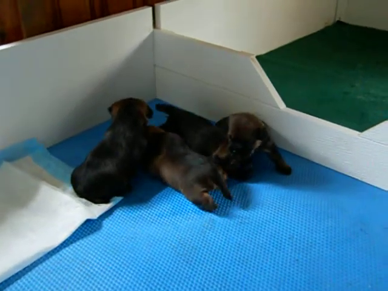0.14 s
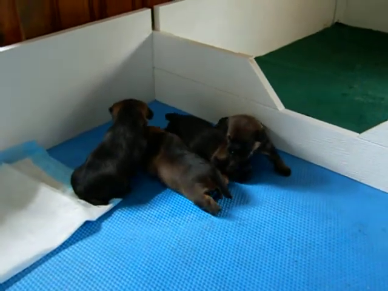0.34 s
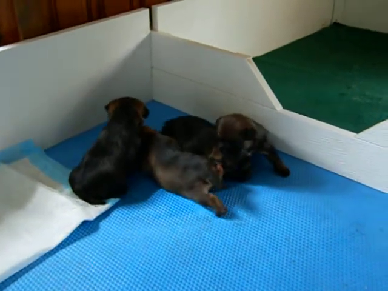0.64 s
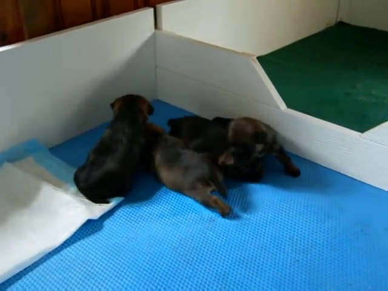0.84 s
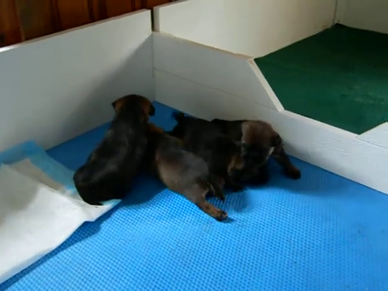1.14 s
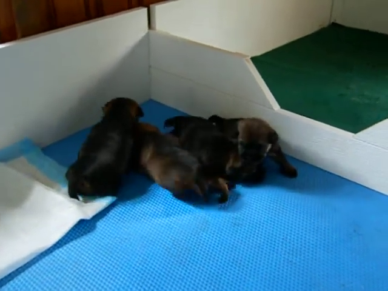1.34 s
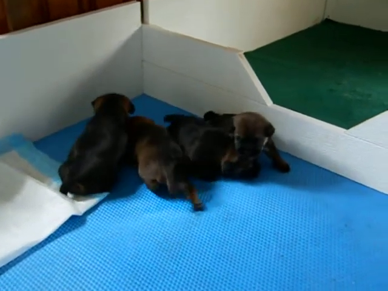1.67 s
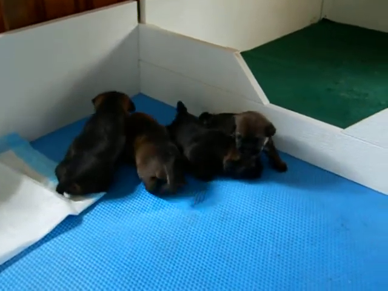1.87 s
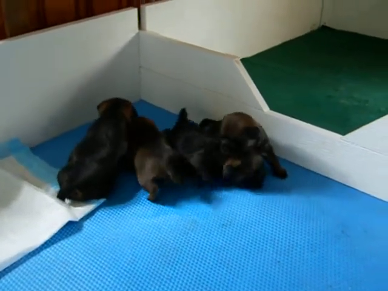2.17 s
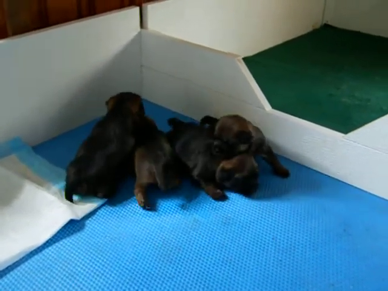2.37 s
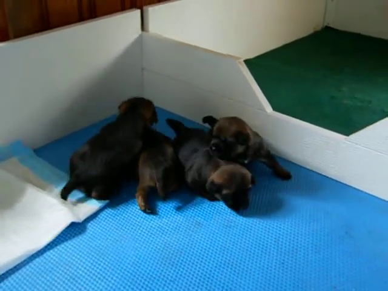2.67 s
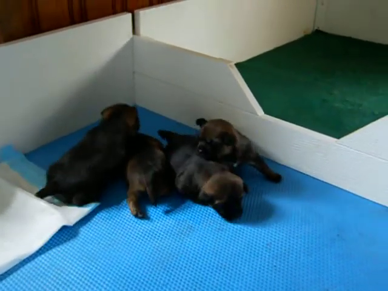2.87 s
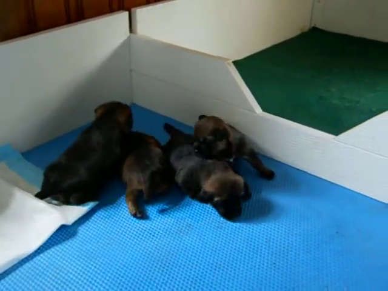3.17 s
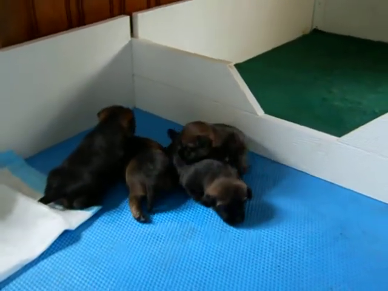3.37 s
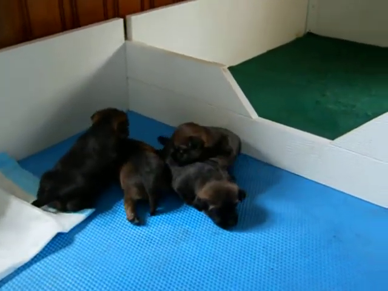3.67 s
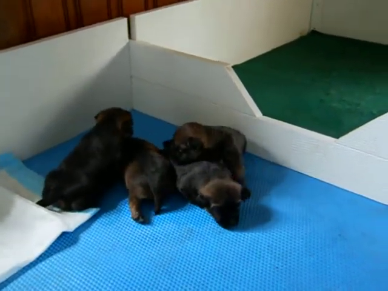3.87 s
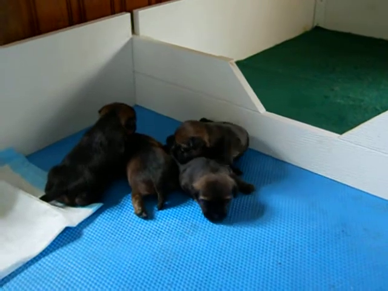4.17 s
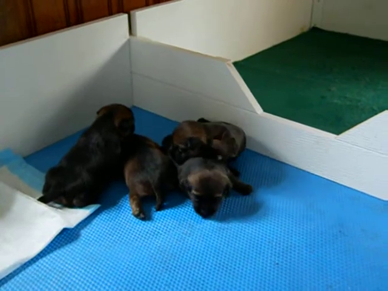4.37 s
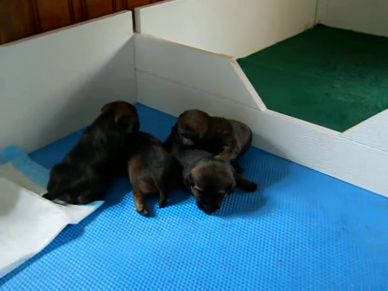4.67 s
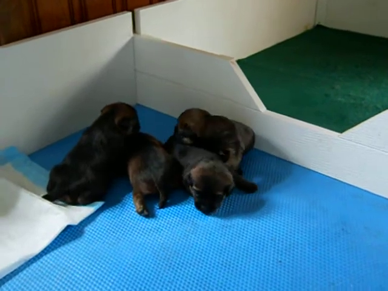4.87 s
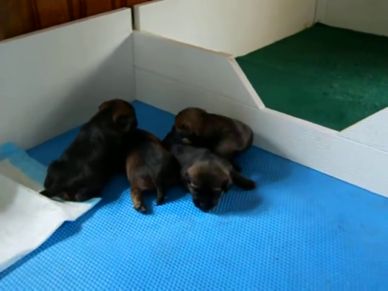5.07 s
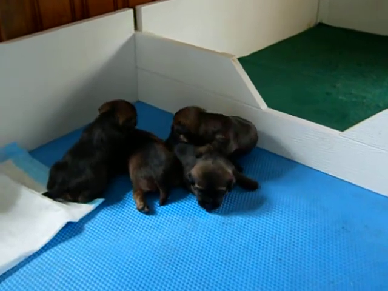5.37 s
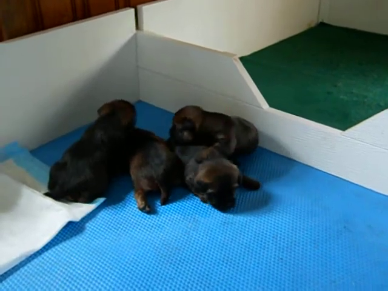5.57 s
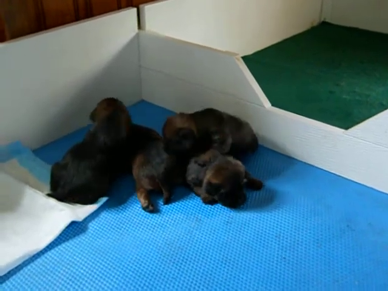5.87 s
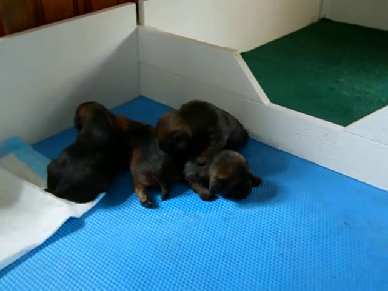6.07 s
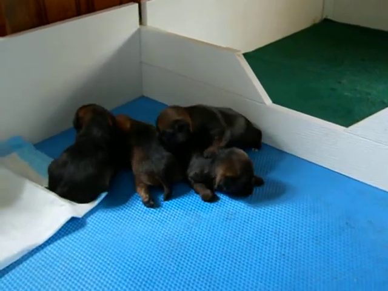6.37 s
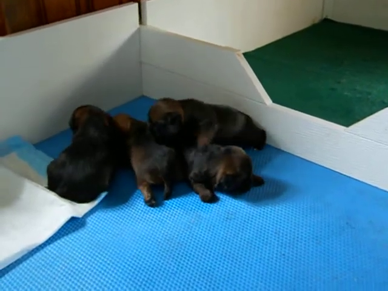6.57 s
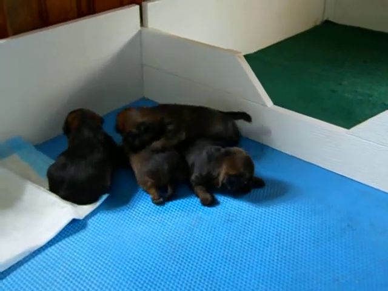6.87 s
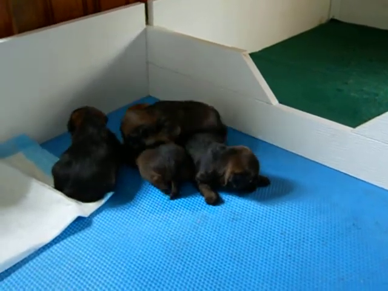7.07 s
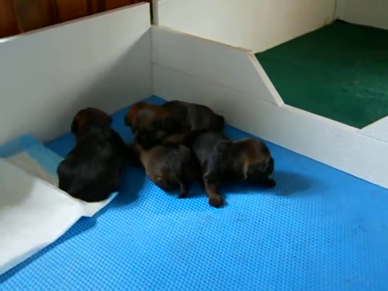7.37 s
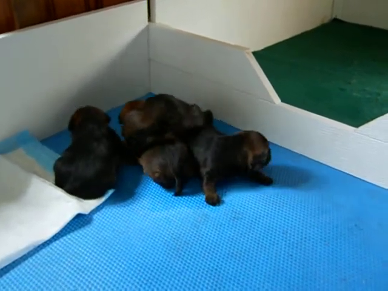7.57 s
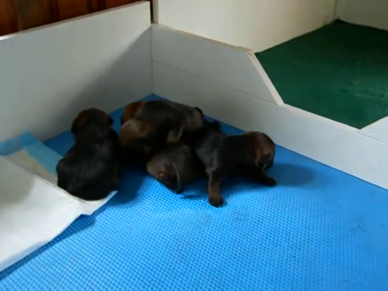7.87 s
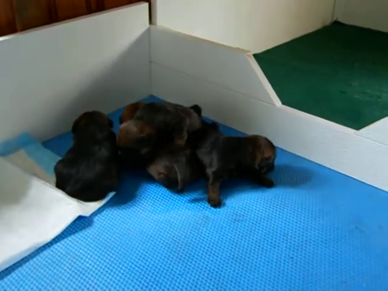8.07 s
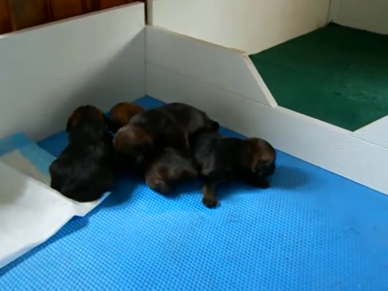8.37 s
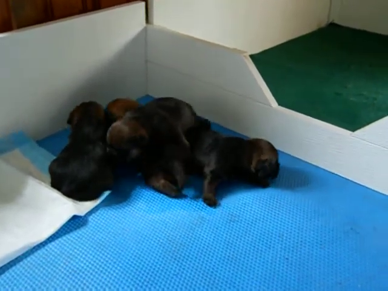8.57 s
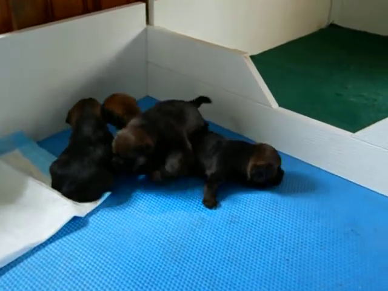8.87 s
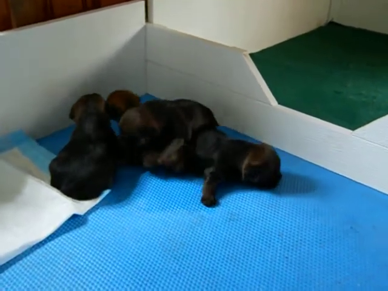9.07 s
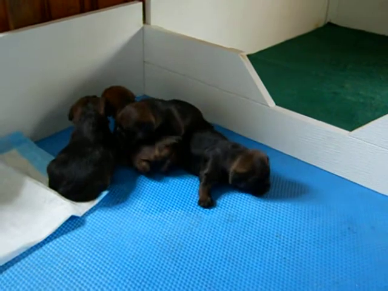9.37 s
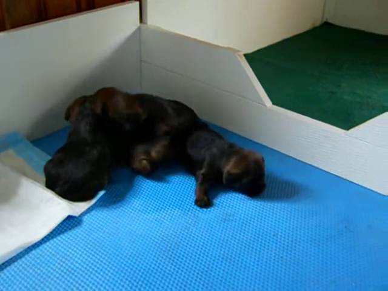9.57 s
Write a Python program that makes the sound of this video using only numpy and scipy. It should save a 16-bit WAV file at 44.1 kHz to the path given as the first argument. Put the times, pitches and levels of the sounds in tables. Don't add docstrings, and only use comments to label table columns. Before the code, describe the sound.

A small camera microphone about a metre away hears tiny pups over low appliance hum and hiss. Paws and fur brush the ribbed mat, claws click sharply, and thin whistle-like squeaks leap upward. Lower whines sag and waver; later one loud cry shakes, drops into a chesty moan and a string of grunts. The boards add a short, boxy ring, and the ending is sparse with mat noises.

```python
import sys
import numpy as np
from scipy import signal
from scipy.fft import rfft, irfft, next_fast_len
from scipy.io import wavfile
from scipy.ndimage import uniform_filter1d

SR = 44100
rng = np.random.default_rng(int(sys.argv[2]) if len(sys.argv) > 2 else 0)


def ratio(d):
    e = np.asarray(d, float) / 20
    return 10 ** e


def digitize_waveform(pressure):
    field = np.atleast_2d(pressure).T
    bounded = np.clip(field, -1, 1)
    quanta = np.round(bounded * 32767).astype(np.int16)
    wavfile.write(sys.argv[1], SR, quanta)


N = 429516
T = np.arange(N) / SR
CONVERTER_HZ = 16000


def level(x, db):
    return x * ratio(db) / np.sqrt(np.mean(x ** 2))


def shape_db(hz, table):
    table_hz, table_db = np.array(table).T
    return np.interp(np.log(hz + 1), np.log(table_hz), table_db)


def colour(x, table):
    size = next_fast_len(len(x))
    hz = np.arange(size // 2 + 1) * SR / size
    return irfft(rfft(x, size) * ratio(shape_db(hz, table)), size)[:len(x)]


def band(x, hz, width):
    edges = [max(hz - width / 2, 10), hz + width / 2]
    return signal.sosfilt(signal.butter(2, edges, "band", fs=SR, output="sos"), x)


def wobble(size, rate):
    hold = max(int(SR / rate), 2)
    steps = np.repeat(rng.standard_normal(size // hold + 1), hold)
    return 1.18 * uniform_filter1d(steps, hold)[:size]


def bump(s, half, power=2):
    out = np.zeros(N)
    span = slice(max(int((s - 5 * half) * SR), 0), int((s + 5 * half) * SR))
    out[span] = np.exp(-np.abs((T[span] - s) / half) ** power)
    return out


def play(table):
    s, *columns = np.transpose(table)
    span = slice(int(s[0] * SR), int(s[-1] * SR))
    to_edge_s = np.minimum(T[span] - s[0], s[-1] - T[span])
    edge = np.clip(to_edge_s / 0.0017, 0, 1)
    return span, [np.interp(T[span], s, c) for c in columns], edge


def background():
    # (pitch [Hz], wander [Hz], rms level [dB])
    hum_tones = [(58.2, 7.4, -56.5), (121, 4.5048, -53), (199.4, 2.09, -53)]
    # (frequency [Hz], density [dB per Hz])
    hiss_spectrum = [(20, -9), (45, -9), (90, -12.5), (150, -10.5), (260, -12), (490, -11.5), (1400, -15.5),
                     (3000, -18), (6100, -20.5)]
    hum = np.zeros(N)
    for hz, wander, db in hum_tones:
        phase = 2 * np.pi * np.cumsum(hz + wander * wobble(N, rate=16)) / SR
        hum += level(ratio(1.3 * wobble(N, rate=12)) * np.sin(phase), db)
    hiss = level(colour(rng.standard_normal(N), hiss_spectrum), -39.5)
    return hum + ratio(0.14 * wobble(N, rate=2.0)) * hiss


def scuffs():
    # (middle [s], rms level [dB], centre [Hz], length [s])
    slides = [(0.067, -41, 3816, .07), (0.242, -40, 3497, 0.051), (0.524, -43.5, 5000, 0.055),
              (0.781, -43, 4000, 0.18), (1.027, -35.5, 4440, 0.036), (1.132, -43, 3930, 0.064),
              (1.275, -43.5, 4130, 0.14), (1.394, -40.5, 4900, 0.087), (1.455, -42, 2506, 0.053),
              (1.816, -40.5, 3480, 0.037), (1.875, -40, 4020, 0.077), (2.15, -43.5, 3740, 0.094),
              (2.329, -41.5, 4000, 0.066), (6.621, -41.5, 4416, 0.028), (6.805, -40, 4860, 0.048),
              (7.059, -35, 4070, 0.02593), (7.119, -38, 6050, 0.0318), (7.24, -43.5, 4040, 0.056),
              (1.846, -38, 2350, 0.011), (7.901, -48, 3787, 0.072), (8.117, -40, 4670, 0.027),
              (8.421, -46, 3479, 0.12), (8.845, -40, 2000, 0.031), (9.174, -41, 5759, 0.047),
              (9.227, -43.5, 3080, 0.04), (9.626, -40, 4006, 0.016)]
    out = np.zeros(N)
    for s, db, hz, length in slides:
        u = np.linspace(-1, 1, int(2 * length * SR))
        grit = rng.standard_normal(len(u)) * ratio(2.8 * wobble(len(u), rate=410))
        start = max(int((s - length) * SR), 0)
        out[start:start + len(u)] += np.exp(-4 * u ** 2) * level(band(grit, hz, 0.89 * hz), db)
    return out


def quiver():
    # (first catch [s], period [s], catches, first share of pitch lost, last share of pitch lost)
    trains = [
        (5.6, .043, 3, .06, .1),
        (5.725, .041, 4, .16, .11),
        (5.893, .0435, 3, .18, .15),
        (6.268, .04, 2, .14, .08),
        (6.355, .048, 5, .17, .13),
        (6.6, .047, 6, .1, .07),
        (5.164, .096, 2, .06, .08),
    ]
    drop_s, recover_s = .007, .015
    lost = np.zeros(N)
    for first_s, period, count, first, last in trains:
        for k, share in enumerate(np.linspace(first, last, count)):
            s = first_s + k * period
            lost += share * np.where(T < s, bump(s, drop_s), bump(s, recover_s, 3 / 2))
    return 1 - lost


def falters():
    # (middle [s], change [dB], half length [s])
    moments = [(4.033, -4, .003), (4.059, -4, .003), (4.12, -1, .003), (4.697, -4, .003), (4.74, -11, .002),
               (4.749, -10, .002), (2.24, -5, .002), (2.253, -7.5, .002), (2.261, -10, 0.0021),
               (2.272, -2, .002), (2.293, -10, 0.0026), (2.505, -12, .002), (2.518, -10, .002),
               (2.55, 2, 0.0045), (2.588, 0.5, .006), (2.602, -5, 0.0087), (2.5, 2, 0.0017),
               (2.635, -11, 0.0046), (2.649, -12, .0016), (2.657, -13, .002), (5.15, -9, .002),
               (5.16, -9, .002), (5.168, -18, .0015), (5.208, -13, .0015), (5.236, -4, .003),
               (5.266, -9, .0015), (5.273, -12, 0.0017), (5.276, -9, .0015), (5.307, -4, .003),
               (5.333, -3, 0.0018), (5.612, -7, .002), (5.617, 7.5, 0.0033), (5.621, -6, .0015),
               (5.638, -9, .002), (5.641, -4, .002), (5.652, -6, .002), (5.661, 5, .004),
               (5.797, -17, 0.0036), (5.803, 5, .002), (5.805, -6, .001), (5.823, -10, .003),
               (5.837, -10, .003), (5.845, 7, 0.0025), (5.849, -9, .001), (2.999, -10, 0.0044),
               (3.075, -4, .003), (3.096, -4, .003), (3.187, -5, .003), (3.214, -4, 0.0022),
               (6.281, 9, .003), (6.332, 8, .011), (6.39, -7, .004), (6.596, -6, 0.0034),
               (6.642, -8, 0.0044), (6.694, -9, .005), (6.735, -10, .007), (6.778, -4, .006),
               (6.85, -12, .005)]
    return ratio(sum(db * bump(s, half) for s, db, half in moments))


def hoarseness():
    # (middle [s], half length [s], half-pitch partials re fundamental [dB], roughness [0-1])
    stretches = [(.785, .04, -14, .15), (1.58, .03, -10, 1.), (1.614, .01, -30, .5), (2.665, .02, -40, .35),
                 (2.88, .01, -8, .6), (3.35, .016, -14, .05), (3.42, .011, -1, .35), (3.462, .025, -9, .5),
                 (3.51, .025, -10, 1.), (3.93, .025, -30, .9), (4.22, .02, -30, .5), (4.765, .012, -30, .4),
                 (4.72, .03, -40, .12), (3.3, .08, -40, .06), (4.1, .1, -40, .05), (5.14, .012, -40, .3),
                 (5.54, .01, -14, .4), (3.97, .022, -30, .7), (3.91, .01, -30, .4), (6.06, .03, -20, .5),
                 (5.26, .12, -40, .07), (5.36, .025, -40, .3), (2.235, .02, -40, .25), (5.78, .1, -40, .28),
                 (5.64, .05, -40, .15), (5.95, .08, -40, .15)]
    half = sum(ratio(db) * bump(s, length) for s, length, db, _ in stretches)
    rough = sum(r * bump(s, length) for s, length, _, r in stretches)
    return half, rough


def falsetto(calls, mouth, dips, breath, hoarse):
    out = np.zeros(N)
    for (db2, db3, top_db), table in calls:
        span, (hz, db1), edge = play(table)
        size = len(hz)
        half, rough = hoarse[0][span], hoarse[1][span]
        steady_db = uniform_filter1d(db1, size=int(.045 * SR), mode="nearest")
        held = ratio(steady_db - db1) / np.sqrt(breath[span])
        partials = [(1, 1), (3 / 2, half), (5 / 2, 0.6 * half)]
        for k, db in ((2, db2), (3, db3), (4, top_db + 4.0), (5, top_db + 4.5)):
            partials.append((k, held * ratio(db + shape_db(k * hz, mouth))))
        hz = hz * dips[span] * (1 + .003 * wobble(size, rate=90) + .08 * rough * wobble(size, rate=700))
        phase = 2 * np.pi * np.cumsum(hz) / SR
        voice = np.zeros(size)
        for k, strength in partials:
            shake = ratio(1.2 * wobble(size, rate=71.0)) + rough * wobble(size, rate=550)
            passed = k * hz < CONVERTER_HZ / 2
            voice += strength * shake * passed * np.sin(k * phase)
        out[span] += np.sqrt(2) * edge * breath[span] * ratio(db1) * voice
    return out


def squeaks(dips, breath, hoarse):
    # ((second, third, top partials re fundamental [dB]), then rows of (time [s], pitch [Hz], level [dB]))
    calls = [
        ((-23, -41, -35), [(0.745, 970, -51), (0.789, 1077, -32), (0.805, 993, -36.5), (0.84, 1030, -43)]),
        ((-13, -21, -19), [(1.56, 1143, -45), (1.575, 1010, -43), (1.59, 950, -41), (1.6, 876, -53)]),
        ((-33, -30, -40), [(1.604, 2240, -39), (1.612, 2140, -37), (1.624, 2100, -46)]),
        ((-18, -41, -60), [(2.178, 1550, -49), (2.19, 1565, -41), (2.21, 1613, -36), (2.225, 1900, -39.5)]),
        ((-34, -18, -79.5), [(2.225, 1896, -31), (2.24, 2160, -34.5), (2.255, 2380, -20), (2.28, 2493, -20), (2.295, 2472, -30.5), (2.325, 2528, -39)]),
        ((-18.5, -15, -77), [(2.483, 1800, -41), (2.495, 1875, -34), (2.5, 1966, -25.5), (2.512, 2140, -24.5), (2.528, 2273, -16.5), (2.542, 2320, -17.5)]),
        ((-24.5, -20, -80), [(2.542, 2304, -17), (2.548, 2328, -12.5), (2.562, 2340, -15.5), (2.59, 2350, -13), (2.598, 2357, -18), (2.62, 2353, -20), (2.645, 2436, -19.5), (2.662, 2480, -33.5), (2.69, 2500, -43)]),
        ((-40, -40, -60), [(5.135, 2326, -46), (5.144, 2300, -24), (5.153, 2290, -35), (5.163, 2250, -28), (5.174, 2280, -24.5), (5.196, 2255, -22.5), (5.2, 2220, -28)]),
        ((-40, -40, -60), [(5.2, 2255, -28), (5.212, 2246, -22.5), (5.226, 2220, -23), (5.243, 2220, -29), (5.256, 2200, -40)]),
        ((-38, -34, -60), [(5.256, 2150, -35), (5.266, 2184, -26), (5.28, 2194, -31), (5.294, 2186, -29), (5.307, 2216, -29.5), (5.325, 2196, -24.5), (5.345, 2210, -33), (5.368, 2120, -40), (5.4, 2240, -53)]),
    ]
    # (frequency [Hz], gain [dB])
    mouth = [(2000, 5), (3200, 12.5), (3700, 9), (4650, 4), (5000, -25.5), (6400, 3), (7050, 1.5),
             (7600, -0.5)]
    return falsetto(calls, mouth, dips, breath, hoarse)


def ticks():
    # (time [s], peak level [dB], ring [Hz])
    taps = [
        (0.839, -18, 4070),
        (1.0254, -18, 3800),
        (1.2314, -25, 4860),
        (1.6272, -22, 4441),
        (1.7882, -12.5, 3350),
        (7.865, -12, 5440),
        (8.2289, -25, 3660),
        (9.5326, -17.5, 5133),
    ]
    t60_s, rise_s = 0.0042, 0.00036
    out = np.zeros(N)
    t = np.arange(SR // 100) / SR
    for s, db, hz in taps:
        tone = np.sin(2 * np.pi * hz * t) + 0.5 * np.sin(2 * np.pi * 1.4 * hz * t)
        ring = np.minimum(t / rise_s, 1) * ratio(-60 * t / t60_s) * tone
        out[int(s * SR):][:len(t)] += ratio(db) * ring
    return out


def chest(hz, bright_db, first_db, rough, throat, flutter):
    phase = 2 * np.pi * np.cumsum(hz * (1 + .05 * rough * wobble(len(hz), rate=250))) / SR
    orders = np.arange(1, 29)[:, None] / 2
    tilt_db = bright_db * np.log2(np.maximum(orders, 1))
    size = ratio(shape_db(orders * hz, throat) + tilt_db + first_db * (orders <= 1))
    size = size * np.where(orders % 1 > 0, .4 * rough, 1)
    rates = [flutter * (.3 if k <= 1 else 1) for k in orders[:, 0]]
    shake = 1 + 1.84 * rough * np.array([wobble(len(hz), rate=r) for r in rates])
    return np.sum(size * shake * np.sin(orders * phase), axis=0) / np.sqrt(np.sum(size ** 2, axis=0) / 2)


def grunts():
    runs = [
        ((340, 0.026, 0.1), [(5.857, -18, -21, 0.023), (5.892, -14, -21, 0.027), (5.93, -16.5, -25, .021), (5.97, -15, -11, .019), (6.007, -15.5, -8, 0.019), (6.044, -16.5, -16, 0.032), (6.3, -28, -8, 0.02)]),
        ((394, 0.15, 0.1), [(6.428, -21.5, -10, .02), (6.462, -22.5, -5.5, 0.029), (6.504, -20, -14, .02), (6.548, -22.5, -2.5, .022)]),
        ((409, 0.203, -0.6), [(6.083, -19.5, -0.5, .028), (6.124, -22.5, -5, 0.035), (6.17, -26, -2, .024), (6.215, -32, -8, 0.023)]),
        ((393, 0.2, -1.2), [(6.88, -24, 1, .022), (6.921, -19, -1.5, .027), (6.962, -18.5, -1.5, .026), (6.997, -18.5, 3, .031), (7.044, -21.5, 2, .027), (7.08, -20, 8, 0.028), (7.127, -24.5, 2.5, .027), (7.172, -25, -6, 0.029), (7.219, -23.5, 3.5, 0.02), (7.259, -23.5, 2, 0.028), (7.307, -21, 5, 0.027), (7.347, -21.5, 5, .04), (7.387, -28.5, -5, .016)]),
    ]
    strays = [
        ((410, 0.23, -0.1), [(1.607, -25.5, 9.6, .045)]),
        ((395, 0.16, 1.7), [(8.828, -31, 1.8, 0.022), (8.85, -36, 9.2, .025)]),
        ((460, 0.31, -0.1), [(9.652, -27, 15, 0.028)]),
        ((399, 0.23, 0.1), [(7.619, -33, -1.5, .026), (7.823, -27, 4.5, .026), (7.851, -31.5, -5.5, 0.028)]),
    ]
    throat = [(200, -23), (320, -5.5), (660, 2), (880, 3.5), (1150, 9.5), (1590, -25.5), (2150, -2),
              (2690, 2.5), (4070, -43), (7000, -47)]
    body = [(230, -13), (340, -0.5), (530, -4.5), (655, 6), (740, -2.5), (830, -1), (950, -6), (1120, 0.5)]
    late_body = [(230, -12), (325, 0.5), (500, -9.5), (657, 6.5), (740, -5.5), (824, 9), (950, 0),
                 (1100, 1)]
    late_s, lead_s, rise = 6.4, .003, .55
    full_db, dull = -16, 0.32
    out = np.zeros(N)
    air = level(band(rng.standard_normal(N), 950, 900), -6.5)
    for (hz, fall, tilt_db), pushes in runs + strays:
        for s, db, first_db, length in pushes:
            u = np.linspace(0, 1, int(1.08 * length * SR))
            push = np.minimum(0.46 + u / rise, 1) * np.minimum(u / 0.06, 1) * np.cos(np.pi * u / 2) ** 0.5
            start = int((s - lead_s) * SR)
            span = slice(start, start + len(u))
            bright_db = -4.5 + tilt_db + dull * min(db - full_db, 0)
            swell_db = first_db - 4 * (2 * u - 1)
            voice = chest(hz * (1 - fall * u), bright_db, swell_db, 0.68, throat, 520)
            out[span] += push * level(voice + ratio(-max(first_db, 0)) * air[span], db - 6)
    return colour(out * (T < late_s), body) + colour(out * (T >= late_s), late_body)


def whines(dips, breath, hoarse):
    # ((second, third, top partials re fundamental [dB]), then rows of (time [s], pitch [Hz], level [dB]))
    calls = [
        ((-6, -37, -16.5), [(2.87, 1710, -48), (2.886, 1658, -34), (2.904, 1690, -34.5), (2.948, 1487, -35.5), (3.086, 1610, -31), (3.106, 1430, -30), (3.144, 1434, -30.5), (3.176, 1345, -27.5), (3.2, 1233, -31)]),
        ((-9, -24, -30), [(3.2, 1194, -26.5), (3.212, 1170, -26), (3.22, 1103, -36), (3.242, 1055, -25.5), (3.302, 1048, -30.5), (3.31, 1032, -28.5), (3.364, 1012, -27), (3.392, 986, -40), (3.4, 963, -45)]),
        ((-6.5, -21, -29.5), [(3.4, 958, -46), (3.425, 985, -36), (3.456, 1034, -32), (3.49, 1074, -41.5), (3.535, 1080, -46.5)]),
        ((-15.5, -18.5, -35), [(3.87, 1427, -45), (3.884, 1334, -35), (3.896, 1215, -30.5), (3.92, 1230, -46), (3.945, 1256, -39.5), (3.978, 1240, -34), (3.988, 1150, -35)]),
        ((-10, -7, -37), [(3.988, 1154, -36), (3.996, 963, -40), (4.008, 855, -39), (4.025, 910, -40)]),
        ((-8, -17.5, -36), [(4.025, 940, -48), (4.029, 942, -38), (4.049, 1042, -26.5), (4.065, 1058, -29.5), (4.079, 1010, -27.5), (4.089, 977, -44), (4.111, 1037, -25.5), (4.129, 1059, -26), (4.145, 1054, -30)]),
        ((2, -13, -37), [(4.145, 1075, -34), (4.153, 1113, -47), (4.185, 1097, -35.5)]),
        ((-3, -16, -35), [(4.185, 1046, -35), (4.193, 1056, -25.5), (4.201, 1024, -27), (4.219, 1004, -45), (4.237, 940, -44), (4.245, 1042, -49)]),
        ((-12.5, -37, -37), [(4.602, 1670, -42), (4.607, 1680, -36), (4.65, 1670, -38), (4.681, 1565, -33.5), (4.715, 1347, -28), (4.735, 1190, -27), (4.745, 1110, -29), (4.757, 1118, -32.5), (4.77, 1050, -45)]),
    ]
    # (frequency [Hz], gain [dB])
    mouth = [(1750, 2), (1950, -4), (2080, -10), (2260, 8.5), (2400, 6), (2700, -4), (3100, -1),
             (3350, -7.5), (6600, -17), (7600, 1.5)]
    return falsetto(calls, mouth, dips, breath, hoarse)


def cry(dips, breath, hoarse):
    # ((second, third, top partials re fundamental [dB]), then rows of (time [s], pitch [Hz], level [dB]))
    calls = [
        ((-12, -15.5, -24.5), [(5.537, 1582, -37), (5.555, 1694, -30), (5.59, 1869, -28.5), (5.628, 1988, -24), (5.665, 1980, -28.5), (5.7, 1744, -41.5), (5.725, 1600, -27.5)]),
        ((-12, -14.5, -29.5), [(5.725, 1693, -28), (5.748, 1657, -35.5), (5.79, 1746, -29.5), (5.832, 1760, -27.5), (5.875, 1673, -26.5), (5.94, 1524, -30), (6.005, 1563, -28), (6.04, 1238, -35.5), (6.09, 1163, -43)]),
    ]
    # (frequency [Hz], gain [dB])
    mouth = [(2400, 12.5), (3100, 3.5), (3450, -1), (3700, 10.5), (4000, -2.5), (5000, -0.5), (6000, -6),
             (8000, 3)]
    return falsetto(calls, mouth, dips, breath, hoarse)


def moan(dips, breath):
    # (time [s], pitch [Hz], level [dB])
    parts = [
        [(6.235, 1107, -40.5), (6.26, 1128, -34), (6.297, 1270, -30.5), (6.33, 1099, -33), (6.385, 966, -32),
         (6.44, 829, -30.5), (6.487, 717, -33), (6.58, 558.6, -30), (6.598, 546, -28)],
        [(6.598, 544.5, -29), (6.672, 458.6, -31), (6.715, 447, -29), (6.765, 423.2, -30), (6.82, 408.7, -29),
         (6.86, 348, -34), (6.885, 316, -44)],
    ]
    mouth_tilt = [(330, -32), (430, -9), (600, -0.5), (900, 0), (1150, 7.5)]
    # (frequency [Hz], gain [dB])
    throat = [(300, -7), (420, -5.5), (660, 5), (1080, 11), (1350, 2), (1590, 0), (2150, 2.5), (2700, 5),
              (3300, -16), (4200, -46)]
    out = np.zeros(N)
    hoarse_start = .7 * bump(parts[0][0][0], .03)
    for part in parts:
        span, (hz, db), edge = play(part)
        rough = np.where(T[span] < 6.42, .1, .2) + hoarse_start[span]
        air = level(band(rng.standard_normal(len(hz)), 810.0, 930.0), -4.5)
        air = air * (.5 + 6 * (1 - dips[span]))
        voice = chest(hz * dips[span], shape_db(hz, mouth_tilt), 0, rough, throat, 300)
        out[span] = edge * ratio(db) * (breath[span] * voice + air)
    return out


def space(dry):
    pen_modes = [(324, -7.5, 0.17), (454, -6.5, 0.1), (684, -16, 0.0085), (843, -8.5, 0.049),
                 (1100, -18.5, 0.052), (2350, -23, 0.026)]
    t = np.arange(SR // 2) / SR
    echoes = np.zeros(len(t))
    # t60 [s], level [dB], start [s]
    for t60, db, start in ((0.14, -11, .003), (.34, -12.5, .015)):
        tail = rng.standard_normal(len(t)) * ratio(-60 * t / t60) * (t > start)
        echoes += ratio(db) * tail / np.sqrt(np.sum(tail ** 2))
    for hz, db, t60 in pen_modes:
        echoes += ratio(db - 60 * t / t60) * np.sin(2 * np.pi * hz * t) / 100
    echoes = colour(echoes, [(200, -0.21), (2000, 1.0), (8000, 0.86)])
    return signal.fftconvolve(dry, echoes)[:N]


def scene():
    dips, breath, hoarse = quiver(), falters(), hoarseness()
    thin = squeaks(dips, breath, hoarse) + whines(dips, breath, hoarse) + cry(dips, breath, hoarse)
    full = scuffs() + ticks() + grunts() + moan(dips, breath)
    return (thin + full + space(ratio(-4) * thin + full) + background())[None]


def top_cut(x):
    return signal.sosfilt(signal.butter(12, 9090, fs=SR, output="sos"), x)


def record(dry):
    microphone = [(7000, 1), (7480, -1), (7750, -8), (8000, -17.5), (8100, -62)]
    mirror = [(7900, -67.5), (8000, 2.5), (8500, -15.5), (8940, -32.5), (9150, -45), (12000, -90)]
    heard = colour(dry[0], microphone)
    image = colour(2 * heard * np.cos(2 * np.pi * CONVERTER_HZ * T), mirror)
    return top_cut((heard + image)[None])


dry = scene()
out = record(dry)
digitize_waveform(out)
```